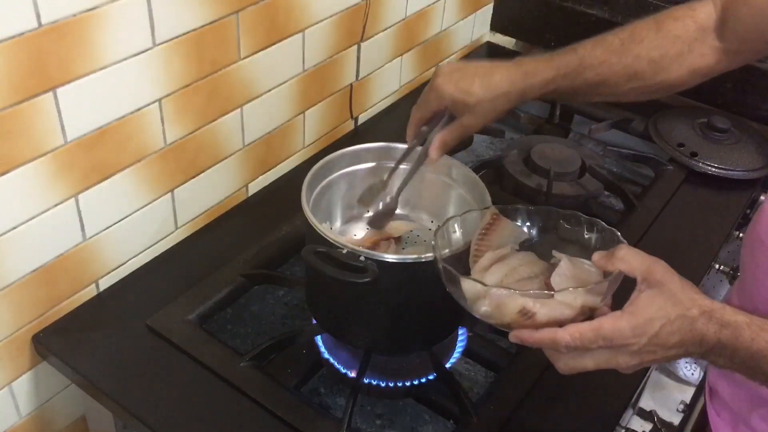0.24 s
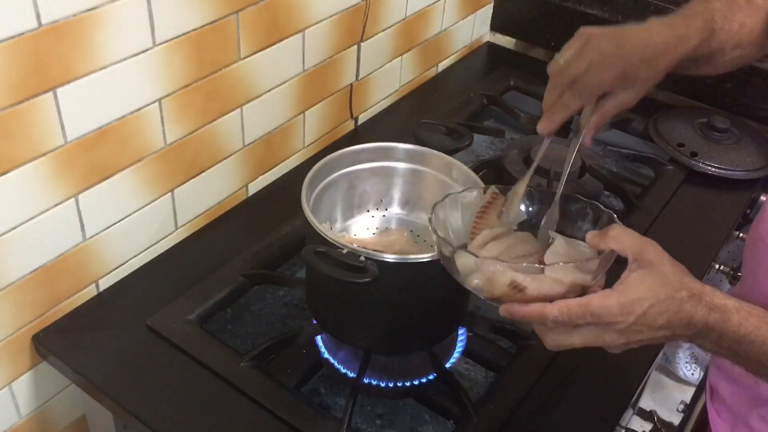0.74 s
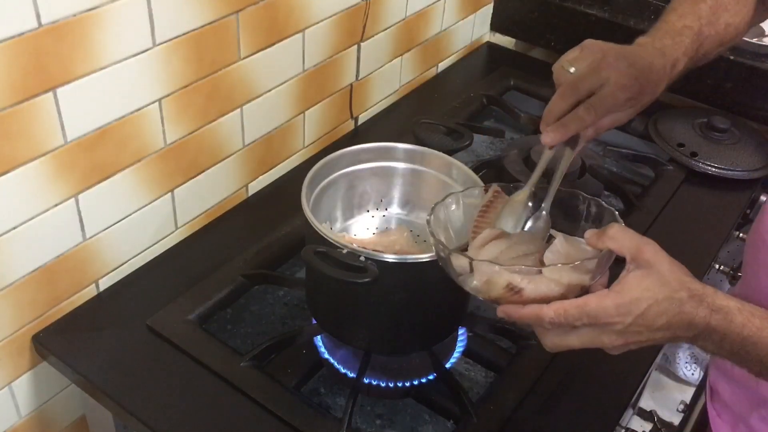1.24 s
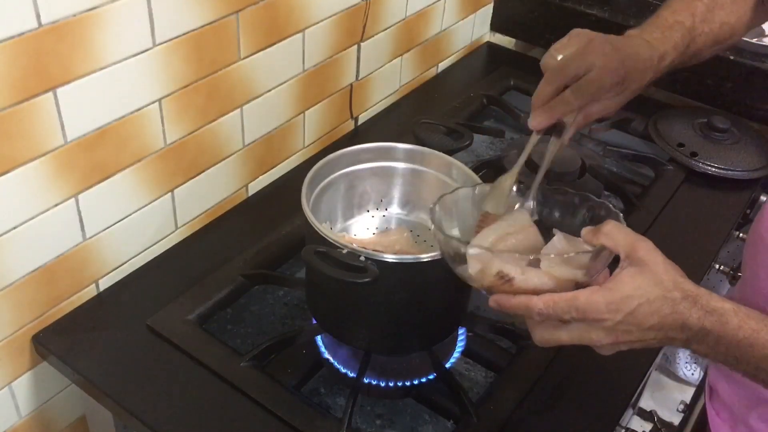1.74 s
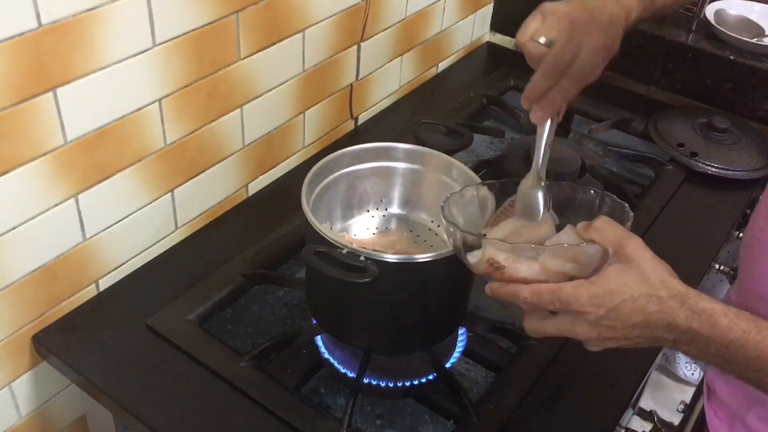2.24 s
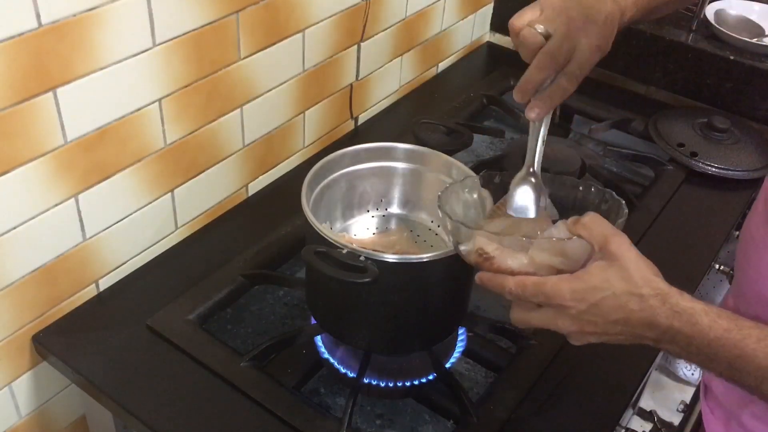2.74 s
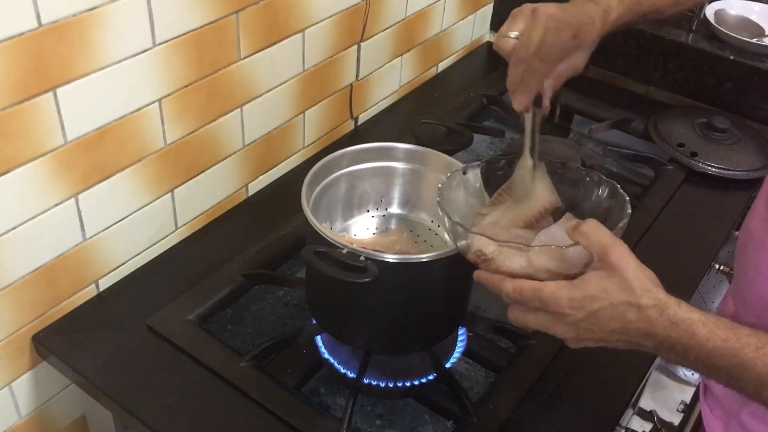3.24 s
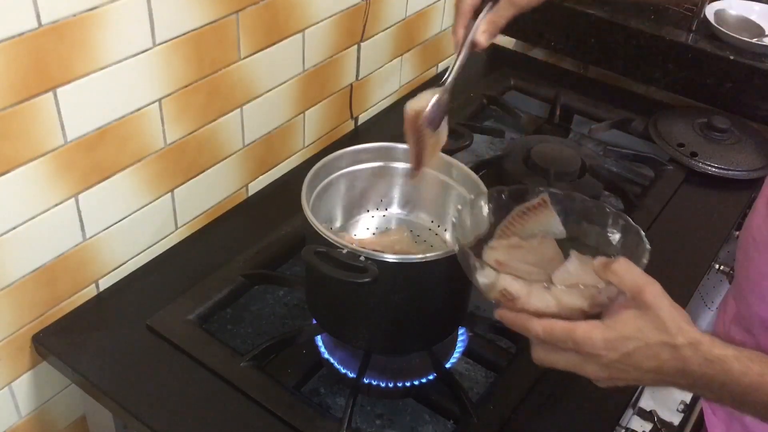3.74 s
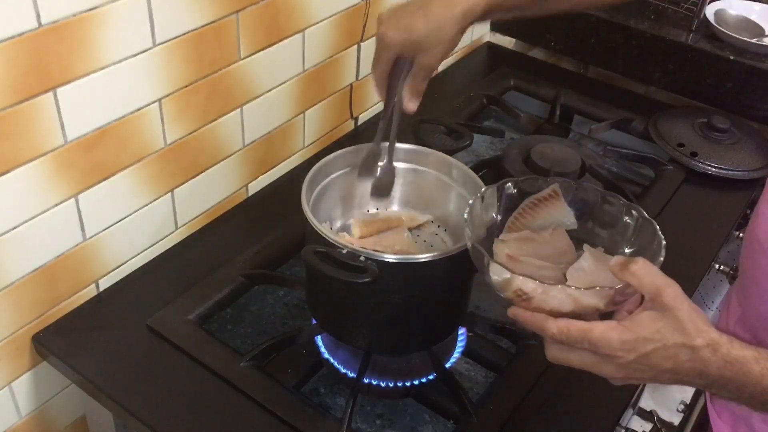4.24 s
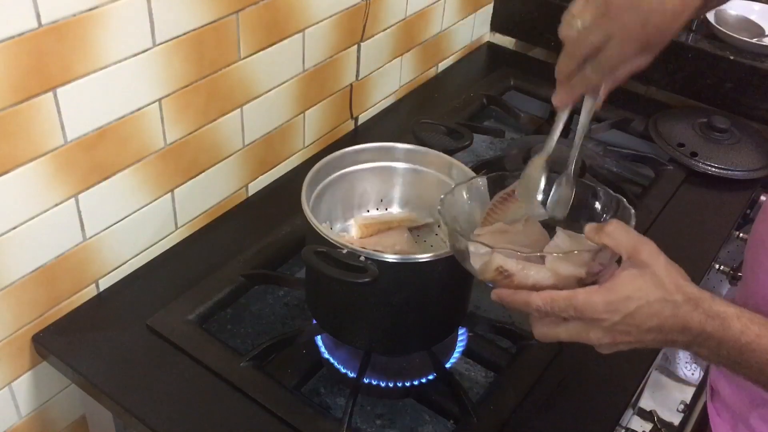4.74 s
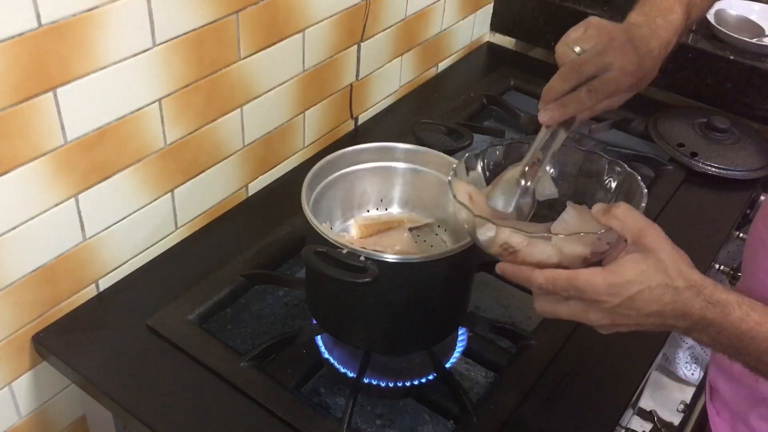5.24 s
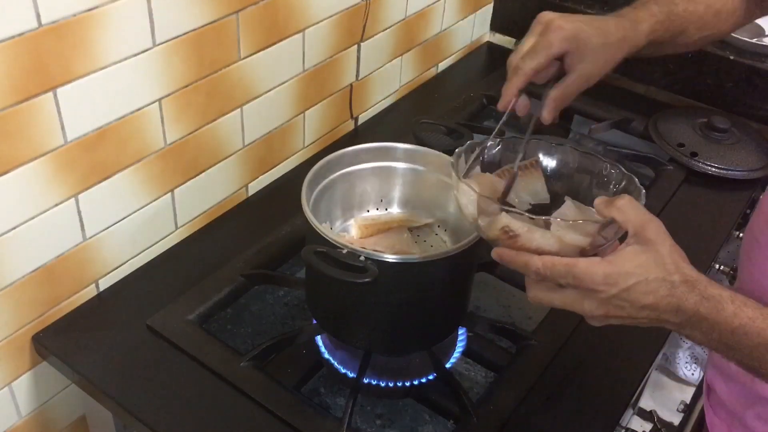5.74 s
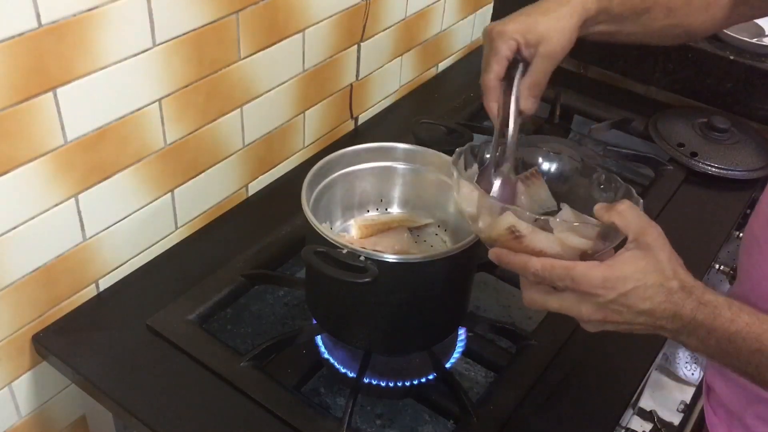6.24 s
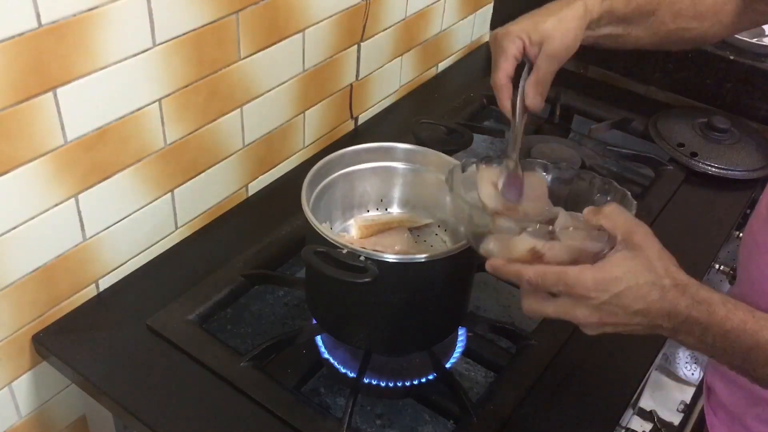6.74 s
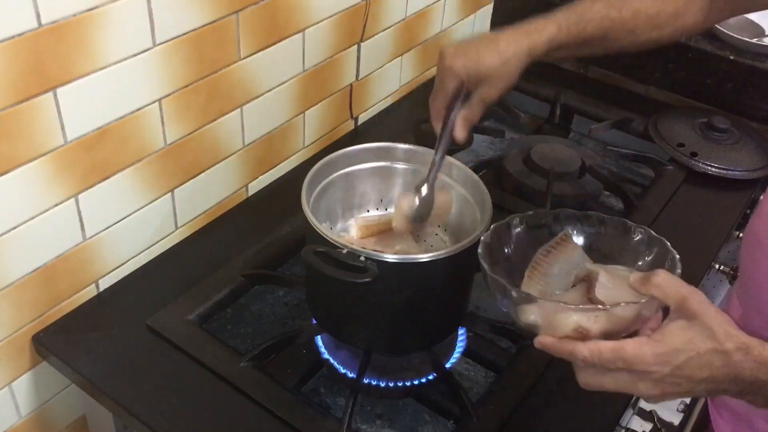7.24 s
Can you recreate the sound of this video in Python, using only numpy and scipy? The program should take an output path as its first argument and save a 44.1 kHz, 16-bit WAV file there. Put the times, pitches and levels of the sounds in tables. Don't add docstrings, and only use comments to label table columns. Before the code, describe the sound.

Close-miked tongs pick wet food from a held glass bowl. A loud rattling clack comes early, then a lighter graze and a sharp pinch, with tiny ticks and faint rubs between. After a quieter gap, one very hard strike makes the glass ring for about half a second; several crisp clacks follow, duller on food-covered glass. Steady low machine hum, barely audible gas hiss, brief tiled-room echo.

```python
import sys
import numpy as np
from scipy import signal
from scipy.fft import rfft, irfft, next_fast_len
from scipy.io import wavfile
from scipy.ndimage import uniform_filter1d, map_coordinates

SR = 44100
rng = np.random.default_rng(int(sys.argv[2]) if len(sys.argv) > 2 else 0)


def wrap_up_sound(samples):
    columns = np.atleast_2d(samples).T
    tamed = np.clip(columns, -1, 1)
    steps = np.round(tamed * 32767).astype(np.int16)
    wavfile.write(sys.argv[1], SR, steps)


def decibels_to_gain(level_db):
    exponent = np.asarray(level_db, float) / 20
    return 10 ** exponent


N = 330660

# pitch_hz, t60_s
TILE_DECAY = [(600, 0.17), (2000, 0.25), (5500, 0.24), (10000, 0.17), (15000, 0.206)]

# start_s, hum_db, hiss_db
STOVE_LEVELS = [
    (0.0, -42, -62.5),
    (7.5, -41, -63),
]
# pitch_hz, level_db (per hertz)
HUM_COLOUR = [(13, -57), (22, -24.5), (38, -17.5), (65, -6.5), (102, -1), (130, -10), (202, -12),
              (228, -22), (267, -16), (476, -27), (850, -31.5), (2350, -45), (2600, -43), (3380, -61.5),
              (5720, -120)]
# pitch_hz, width_hz, lift_db
MOTOR_TONES = [(50.6, 8, 3.7), (101.4, 10, 8.1), (180, 10, 6), (202, 14, 7), (272.4, 5, 2), (308, 6, 8)]
# pitch_hz, level_db (rms)
MAINS_TONE = (50.3, -55)
# pitch_hz, level_db
HISS_COLOUR = [(880, -28), (1500, -5.5), (2350, -28.5), (2600, -2.5), (5210, -6), (6090, -0.5),
               (8010, -1.5), (9370, -3.5), (10800, -4), (14600, 1), (15600, -13)]
# pitch_hz, width_hz, lift_db
PIPE_TONES = [(2526, 39, 21.5), (2645, 72, 8), (3230, 97, 10), (3530, 40, 11.5), (3860, 56, 11.5),
              (4245, 40, 8.5), (4610, 27, 12.5), (4880, 35, 5), (5300, 43, 7.5), (6100, 89, 15),
              (6464, 52, 10.5), (6655, 45.6, 0), (7050, 55, -9), (8900, 180, 2), (9100, 150, 8.5),
              (9550, 72, 13.5), (12530, 120, 7), (14500, 180, -4), (14700, 100, 7), (14800, 340, 12)]

# start_s, length_s, level_db, pitch_hz
FOOD_DRAGS = [(.55, .04, -65, 6000), (.56, .03, -63, 2100), (.6, .05, -62, 3400), (.97, .15, -60, 2000),
              (4.498, .027, -68, 12000), (4.8, .25, -57, 9000), (5.05, .1, -60, 5500),
              (4.95, .09, -62, 11000), (4.85, .15, -60, 2200), (4.6, .18, -58, 4500),
              (6.15, .06, -62, 11000), (6.4, .1, -62, 4500)]
# start_s, length_s, level_db, pitch_hz (band
GLASS_SQUEAKS = [(.42, .17, -66, 1330), (1.551, .01, -56, 5500), (2.5, .1, -70, 1460),
                 (3.195, .03, -61, 2700), (3.62, .12, -70, 1300), (3.68, .02, -63.5, 9400),
                 (4.498, .027, -67.5, 5300), (4.938, .008, -46, 5350), (5.011, .01, -59, 5050),
                 (5.99, .07, -64, 2450), (6.01, .05, -67, 5200), (6.15, .05, -64, 5200),
                 (6.44, .065, -55, 2560), (6.39, .06, -59, 3400), (6.43, .03, -62, 3050),
                 (4.236, .007, -48, 900), (6.345, .03, -58, 1230), (.277, .025, -62, 3400),
                 (6.44, .06, -63, 5400)]
# start_s, peak_db, pitch_hz (snap centre), knock_db
WET_TICKS = [(0.2409, -46, 8000, -27.5), (0.2483, -41, 8690, -27), (1.5224, -35, 8800, -31),
             (1.535, -31, 13800, -36.5), (1.5439, -31, 13200, -33), (1.6132, -42.5, 11700, -4),
             (1.6294, -42, 14500, -21), (1.7489, -45, 13900, -27), (2.389, -40, 14700, -17),
             (2.8689, -43, 12400, -25), (2.9207, -43, 14500, -24), (2.9452, -42, 15200, -22.5),
             (3.1833, -31, 14800, -38.5), (3.246, -45, 8300, -15), (3.262, -36, 14100, -29),
             (3.4362, -46, 12600, -26), (3.498, -38.5, 13100, -32), (3.683, -47, 8820, -19),
             (3.6994, -56, 9910, -18.5), (3.7172, -36.5, 13800, -33), (3.814, -49, 6530, -18),
             (4.239, -47.5, 3000, 2), (4.832, -21.5, 9100, -25), (4.834, -25.5, 4750, -15),
             (5.5301, -47, 14600, -13), (6.1609, -40, 12600, -24.5), (6.4894, -34, 12100, -13),
             (6.571, -38, 3900, -14)]

# pitch_hz, split_hz, t60_s
FREE_TONES = [(1364, 2, .55), (2466, 7, .6), (3772, 11, .5), (5240, 12, .4), (6980, 12, .4)]
# pitch_hz, split_hz, t60_s
RIM_TONES = [(2560, 14, .12), (3772, 11, .4), (5270, 16, .36), (6980, 12, .36), (8900, 60, .2)]
# pitch_hz, split_hz, t60_s
HELD_TONES = [(1362, 6, .1), (2460, 3, .36), (3775, 22, .15), (5240, 25, .2), (6982, 25, .12)]
# pitch_hz, split_hz, t60_s
LOADED_TONES = [(1340, 10, .24), (2405, 14, .28), (3690, 22, .3), (5300, 30, .27), (6945, 25, .26)]
FREE_RADIATION = [-6, -5.5, -3.7, -5.5]
RIM_RADIATION = [2.5, 2, -7, -2]
HELD_RADIATION = [-5, -1.5, -5, -13]
LOADED_RADIATION = [1.5, -1.5, -1.4, -2.2]
# start_s, strength_db, favoured_tone (0-4), loss_db (a tone away), lowest_tone_db
FREE_CHIMES = [
    (4.524, -17, 3.3, 5.5, 2.5),
]
RIM_BLOWS = [
    (4.7936, -35, 1.8, 8, 1),
    (4.8317, -34, 2.9, 16, -5),
]
HELD_BLOWS = [
    (0.8255, -33, 0.77, 2.5, -7),
    (1.1872, -60, 1.9, -6, -6),
    (1.2401, -44.5, 2, 14, -4),
    (1.4343, -46.5, 3.9, 0.5, -10),
    (6.3315, -53, 1.1, 10, -14),
    (6.4874, -56, 0.5, -2.5, 5.5),
]
LOADED_BLOWS = [
    (5.5732, -41, 1.67, 8.5, 5),
    (5.6984, -33.5, 4.6, 2.5, 3),
    (6.1604, -64, 3.4, 10, -2),
]
CLUSTER = [(0, 1), (1, .45), (-2.3, .35)]

# pitch_hz, width_hz, level_db
CRACK_BANDS = [(3460, 460, -17.5), (4510, 1500, -7.5), (6360, 950, 4), (9130, 760, 1), (11440, 3200, 4),
               (14600, 1600, -17.5)]
# pitch_hz, width_hz, level_db
THUD_BANDS = [(985, 230, -1), (1680, 330, 0)]
# pitch_hz, width_hz, level_db
OPEN_ARMS = [(1650, 82, -8), (2430, 100, 0), (3700, 88, -4), (5220, 110, -5), (6930, 120, -19),
             (8730, 95, -16), (10800, 110, -15), (11600, 89, -20), (14000, 110, -28), (14600, 200, -25)]
LOOSE_ARMS = [(1750, 130, -18), (1950, 100, -20), (3770, 140, -16), (5240, 70, -9), (6530, 70, -6),
              (7610, 120, -9), (8970, 80, 1), (9670, 290, -11), (11200, 130, -5), (11870, 100, -3),
              (12230, 110, -4), (13200, 96, 0), (14100, 110, -7), (15300, 160, -2)]
PINCHED_ARMS = [(1240, 190, -21.5), (3240, 92, -8), (4250, 440, -8), (5430, 340, -9), (6060, 110, 2.5),
                (7160, 100, -19), (7620, 130, -2.5), (8740, 170, 1), (9360, 180, -9), (10500, 65, -6),
                (12100, 120, 1), (12470, 100, -18), (13650, 92, -1), (14600, 180, 1)]
WIDE_ARMS = [(1230, 90, -13), (2410, 110, -13), (3400, 30, -5), (3850, 130, -10), (5390, 130, -13),
             (6170, 110, -9), (6830, 140, -11), (7800, 180, -14), (9020, 190, -2), (9400, 160, 0),
             (11100, 180, -2), (11800, 120, -3), (12900, 84, -4), (15400, 110, -7)]
CROSSED_ARMS = [(1790, 150, -10), (2540, 130, -7), (3770, 160, -9), (4710, 85, -12), (5330, 120, -2),
                (5850, 100, -4), (7010, 99, -8), (7630, 100, -14), (9010, 60, 0), (10900, 110, -12),
                (11900, 120, -4), (12700, 140, -6), (13400, 87, -9), (15400, 110, -3)]
LIGHT_ARMS = [(1690, 180, -8), (3840, 99, -1), (4740, 64, 5), (6200, 53, 7), (7300, 81, -4),
              (8900, 320, -5), (11400, 140, -16), (12100, 120, -13), (13800, 160, -14), (15200, 180, -17)]
BARE_TIPS = [(1190, 78, 3), (3930, 150, -5), (8800, 120, 0), (9450, 140, -18), (10440, 170, -2),
             (11700, 140, 3), (12600, 110, -2), (14800, 140, 0)]
GRAZING_ARMS = [(1650, 140, -9), (2440, 96, -7), (3400, 60, -7), (3800, 93, -6), (5270, 70, -5),
                (6980, 160, -15), (8820, 85, -7), (9730, 210, -6), (11900, 130, -2), (12300, 98, -6),
                (13300, 210, -4), (14000, 140, -5), (14800, 120, -9), (15500, 170, -8)]
SWUNG_ARMS = [(2480, 110, -12), (3770, 35, 1), (4400, 90, -14), (5240, 70, 2), (5850, 80, -5),
              (6330, 90, -7), (6980, 60, -2), (8800, 110, -11), (11030, 100, -7), (11360, 90, -5),
              (11980, 110, -2), (12920, 100, -5), (13590, 100, -6), (15550, 100, -8)]
CLOSING_ARMS = [(1370, 110, -12), (2450, 130, -9), (3730, 130, -14), (5260, 130, -4), (6480, 82, -5),
                (6960, 91, 0), (8120, 120, -17), (8770, 86, -5), (9040, 89, -3), (11200, 130, -11),
                (12200, 240, -10), (13300, 150, -13), (14900, 110, -12), (15500, 120, -7)]
BRUSHING_ARMS = [(3070, 250, -10), (4220, 140, -3), (4820, 110, -2), (6040, 110, -4), (6920, 86, -5),
                 (7760, 100, -3), (8970, 120, -13), (10700, 64, -3), (11100, 100, -4), (11700, 94, 0),
                 (12000, 97, -1), (13800, 95, -7), (14400, 100, -5), (15200, 150, -6)]
# start_s, peak_db, brightness_db (an octave), crack_db, thud_db
OPEN_HITS = [
    (1.1872, -37, -12, 2.5, -11),
    (5.5722, -26.5, 3, -7.5, -15),
]
LOOSE_HITS = [
    (0.8236, -7, 0.44, -2.4, -31.5),
]
PINCHED_HITS = [
    (2.4327, -9, 0.3, -1.7, -44),
]
WIDE_HITS = [
    (6.331, -7.5, 0.033, -2, -31.5),
]
CROSSED_HITS = [
    (4.7936, -9.5, 0.37, -10, -25.5),
]
LIGHT_HITS = [
    (0.9223, -29, -0.44, 3.4, -16),
    (1.1318, -32, 0.46, 2, -7),
    (1.2386, -35.5, 0.1, 3.7, -28),
]
TIP_HITS = [
    (0.2768, -42.5, 0.98, 7.5, 0),
    (3.0589, -30.5, 0.1, -6.5, -28),
]
GRAZING_HITS = [
    (1.4349, -15.5, 1.4, -18, -22),
]
SWUNG_HITS = [
    (4.5246, 1.2, 0.5, -8.5, -20),
]
CLOSING_HITS = [
    (5.6989, -13, 0.32, -1, -21),
]
BRUSHING_HITS = [
    (5.0429, -23, 0.5, -0.5, -9.5),
]
# delay_s, level_db
LOOSE_CHATTER = [
    (.0032, -4),
    (.0062, -8),
]
CROSSED_CHATTER = [
    (.0045, -3.5),
]


def unit(x):
    return x / np.sqrt(np.mean(x ** 2) + 1e-20)


def along(points, hz):
    f, v = np.transpose(points)
    return np.interp(np.log(hz + 1), np.log(f), v)


def filtered(x, response):
    m = next_fast_len(len(x) + 4096)
    return irfft(rfft(x, m) * response(np.fft.rfftfreq(m, 1 / SR)), m)[:len(x)]


def resonances(modes):
    def response(f):
        return sum(decibels_to_gain(db) * 1j * f * width / (hz * hz - f * f + 1j * f * width) for hz, width, db in modes)
    return response


def add(track, start_s, sound):
    part = track[round(start_s * SR):][:len(sound)]
    part += sound[:len(part)]


def half_second():
    return np.arange(SR // 2) / SR


def burst(t60_s):
    t = half_second()
    rise = 1 - np.exp(-t / .0003)
    return rng.standard_normal(len(t)) * decibels_to_gain(-60 * t / t60_s) * rise / 2


def tiled(x, echo_db):
    hz, t, z = signal.stft(rng.standard_normal(SR // 2), SR, nperseg=256)
    fade_db = -60 * t / along(TILE_DECAY, hz)[:, None]
    near, far = decibels_to_gain(fade_db), decibels_to_gain(-21 + .45 * fade_db)
    tail = signal.istft(z * (near + far), SR, nperseg=256)[1]
    delayed = np.pad(x, (200, 0))
    late = signal.fftconvolve(delayed, tail / np.linalg.norm(tail))[:len(x)]
    return x + decibels_to_gain(echo_db) * late


def steady(spectrum, peaks, patchy_db):
    z = signal.stft(rng.standard_normal(N), nperseg=512)[2]
    patches = uniform_filter1d(rng.standard_normal(z.shape), 6, 0)
    patches = uniform_filter1d(patches, 16, 1)
    x = signal.istft(z * decibels_to_gain(patchy_db * unit(patches)), nperseg=512)[1][:N]

    def colour(f):
        lift_db = sum(db / (1 + (2 * (f - hz) / width) ** 2) for hz, width, db in peaks)
        return decibels_to_gain(along(spectrum, f) + lift_db)
    return unit(filtered(x, colour))


def stove():
    start_s, hum_db, hiss_db = np.transpose(STOVE_LEVELS)
    t = np.arange(N) / SR
    hum = decibels_to_gain(np.interp(t, start_s, hum_db)) * steady(HUM_COLOUR, MOTOR_TONES, patchy_db=1)
    mains_hz, mains_db = MAINS_TONE
    hum += decibels_to_gain(mains_db + 2) * np.sin(2 * np.pi * mains_hz * t)
    hiss = steady(HISS_COLOUR, PIPE_TONES, patchy_db=-0.5)
    return hum + decibels_to_gain(np.interp(t, start_s, hiss_db)) * hiss


def slides(strokes, width):
    out, t = np.zeros(N), half_second()
    for start_s, length_s, db, hz in strokes:
        grains = rng.standard_normal(len(t)) * decibels_to_gain(3 * rng.standard_normal(len(t)))
        swell = np.sin(np.pi * np.clip(t / length_s, 0, 1))
        rub = swell * unit(filtered(grains, resonances([(hz, width * hz, 0)])))
        add(out, start_s, decibels_to_gain(db) * tiled(rub, echo_db=-2.5))
    return out


def ticks():
    out = np.zeros(N)
    for start_s, db, hz, knock_db in WET_TICKS:
        snap = filtered(burst(.01), resonances([(hz, .2 * hz, 0), (13000, 4000, -12)]))
        knock = filtered(burst(.02), resonances([(1300, 900, 0)]))
        both = snap / np.abs(snap).max() + decibels_to_gain(knock_db - 2) * knock / np.abs(knock).max()
        add(out, start_s, decibels_to_gain(db) * tiled(both, echo_db=-5))
    return out


def bowl(chimes, tones, radiation_db, lasting):
    out, t = np.zeros(N), half_second()
    waver_hz, waver_rad = 60, 0.2
    first_db, first_db_per_tone, first_t60_s = 4, 3.5, .12
    for start_s, blow_db, favoured, loss_db, lowest_db in chimes:
        distance = np.abs(np.arange(len(tones)) - favoured)
        levels_db = blow_db + np.array([lowest_db, *radiation_db]) - loss_db * distance
        knots = rng.standard_normal((len(tones), 64))
        ring = np.zeros(len(t))
        for order, (hz, split_hz, t60_s) in enumerate(tones):
            waver = waver_rad * map_coordinates(knots[order], [t * waver_hz])
            fade = decibels_to_gain(levels_db[order] - 10.5 - 60 * t / (lasting * t60_s))
            fade *= 1 + decibels_to_gain(first_db + first_db_per_tone * order - 60 * t / first_t60_s)
            for offset, share in CLUSTER:
                phase = 2 * np.pi * (hz + offset * split_hz) * t + order * waver
                ring += fade * share * np.sin(phase)
        add(out, start_s + .001, tiled(ring * (1 - np.exp(-t / .0005)), echo_db=-8))
    return out


def tongs(clacks, grip, rebounds=()):
    out, t = np.zeros(N), half_second()
    rattle_t60_s = .025
    hz, width, level_db = np.transpose(grip)[:, :, None]
    for start_s, db, bright_db, crack_db, thud_db in clacks:
        lag, phase = rng.random((2, len(grip), 1))
        since = np.maximum(t - .07 * rattle_t60_s * lag ** 2, 0)
        fade = width * np.exp(-np.pi * 1.25 * width * since) * (1 - np.exp(-since / .0002))
        tone = np.sin(2 * np.pi * (hz * since + phase))
        ring = (decibels_to_gain(level_db + bright_db * np.log2(hz)) * fade * tone).sum(axis=0)
        crack = filtered(burst(rattle_t60_s), resonances(CRACK_BANDS))
        crack = filtered(crack, resonances([(9000, 14000, 0)]))
        thud = filtered(np.exp(-t / .0001), lambda f: sum(resonances([mode])(f) ** 2 for mode in THUD_BANDS))
        parts = [(ring, 0), (crack, crack_db), (thud, thud_db + 1)]
        steel = sum(decibels_to_gain(gain_db) * part / np.linalg.norm(part) for part, gain_db in parts)
        steel = tiled(steel, echo_db=-6)
        for delay_s, rebound_db in [(0, 0), *rebounds]:
            add(out, start_s + delay_s, decibels_to_gain(db + 11.5 + rebound_db) * steel)
    return out


def scene():
    rubs = slides(FOOD_DRAGS, width=.9) + slides(GLASS_SQUEAKS, width=.075)
    glass = bowl(FREE_CHIMES, FREE_TONES, FREE_RADIATION, lasting=1.05)
    glass += bowl(RIM_BLOWS, RIM_TONES, RIM_RADIATION, lasting=1.15)
    glass += bowl(HELD_BLOWS, HELD_TONES, HELD_RADIATION, lasting=.95)
    glass += bowl(LOADED_BLOWS, LOADED_TONES, LOADED_RADIATION, lasting=.8)
    steel = sum(tongs(clacks, grip) for clacks, grip in (
        (OPEN_HITS, OPEN_ARMS), (SWUNG_HITS, SWUNG_ARMS), (CLOSING_HITS, CLOSING_ARMS),
        (LIGHT_HITS, LIGHT_ARMS), (BRUSHING_HITS, BRUSHING_ARMS), (PINCHED_HITS, PINCHED_ARMS),
        (WIDE_HITS, WIDE_ARMS), (TIP_HITS, BARE_TIPS), (GRAZING_HITS, GRAZING_ARMS)))
    steel += tongs(LOOSE_HITS, LOOSE_ARMS, LOOSE_CHATTER)
    steel += tongs(CROSSED_HITS, CROSSED_ARMS, CROSSED_CHATTER)
    return (stove() + rubs + ticks() + glass + steel)[None]


def low_pass(x):
    return signal.sosfilt(signal.butter(12, 17020, fs=SR, output="sos"), x)


def record(dry):
    def edge(hz, top_hz):
        return np.clip((top_hz - hz) / 120 + .5, 0, 1) ** 2
    capped = dry[0] / (1 + np.abs(dry[0] / .9) ** 4) ** .25
    limited = filtered(capped, lambda hz: edge(hz, 15790) + decibels_to_gain(-42) * edge(hz, 16700))
    return low_pass(limited[None])


dry = scene()
out = record(dry)
wrap_up_sound(out)
```